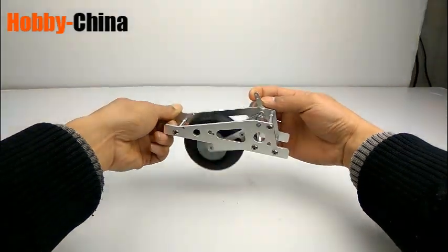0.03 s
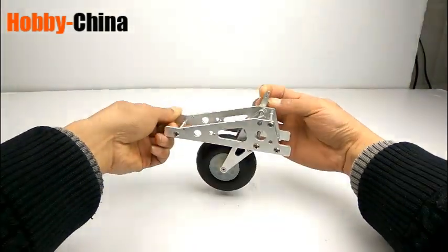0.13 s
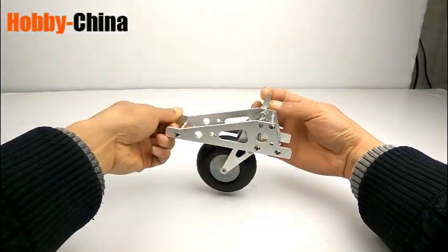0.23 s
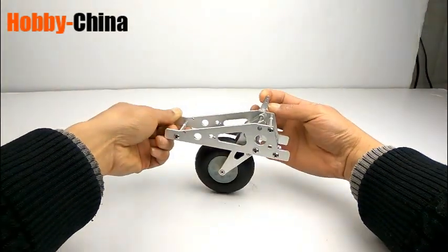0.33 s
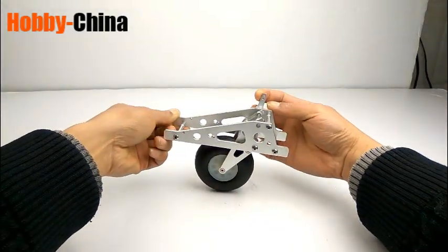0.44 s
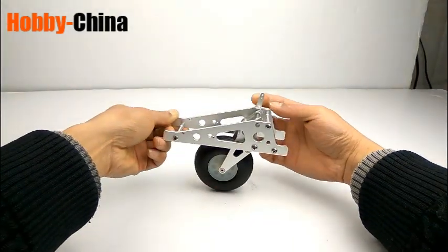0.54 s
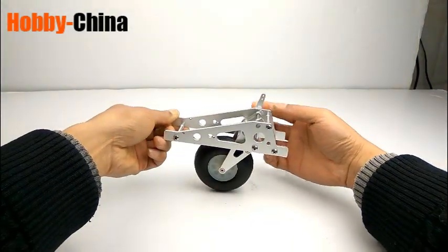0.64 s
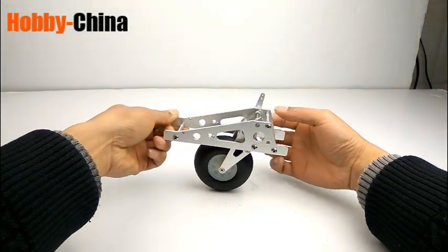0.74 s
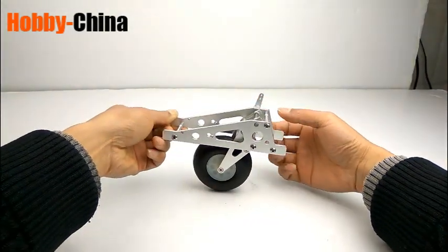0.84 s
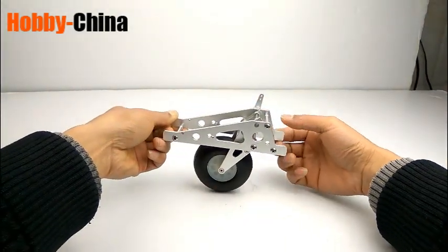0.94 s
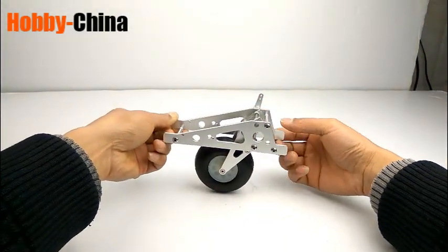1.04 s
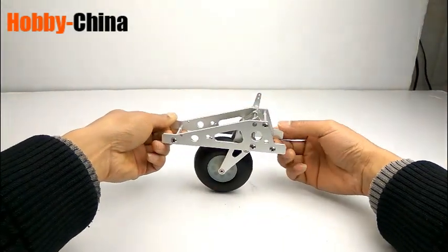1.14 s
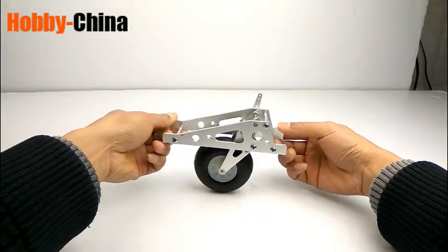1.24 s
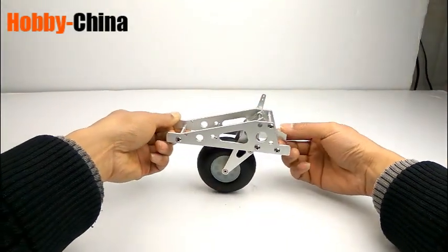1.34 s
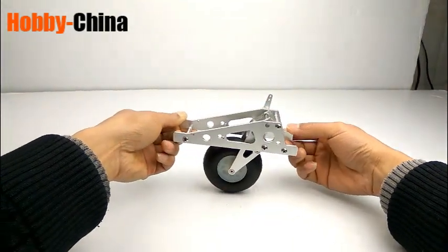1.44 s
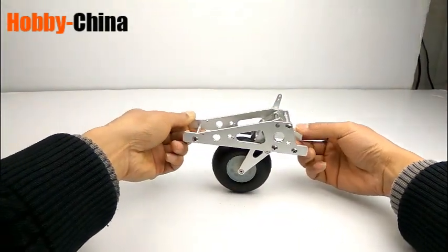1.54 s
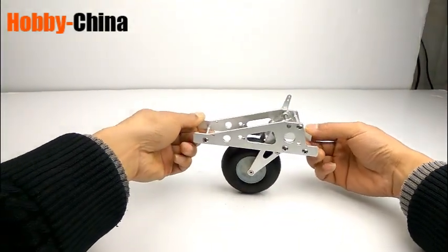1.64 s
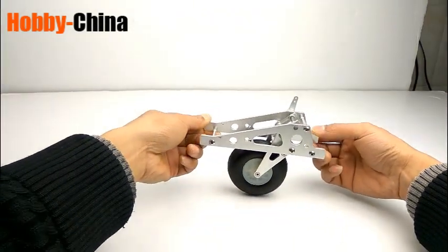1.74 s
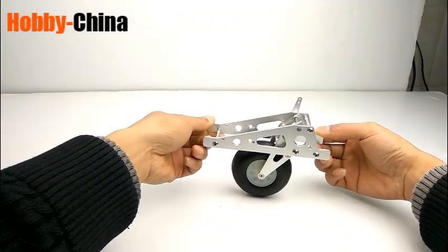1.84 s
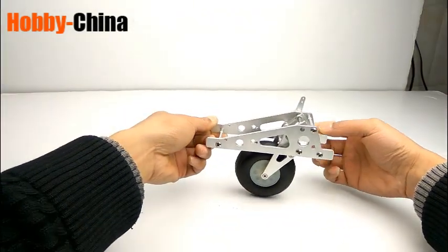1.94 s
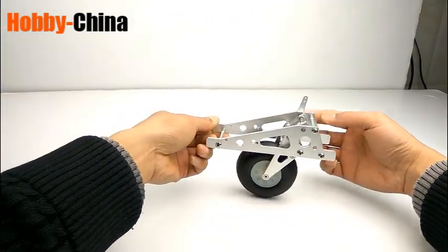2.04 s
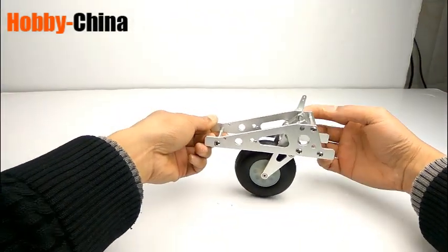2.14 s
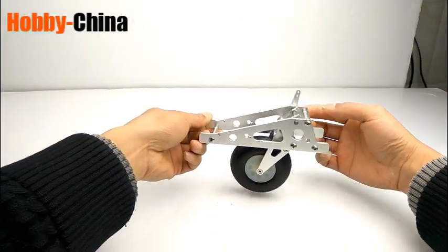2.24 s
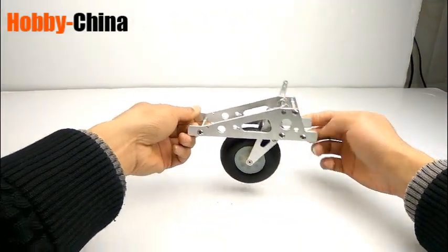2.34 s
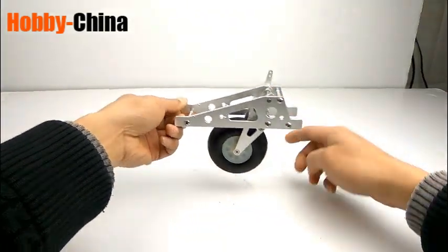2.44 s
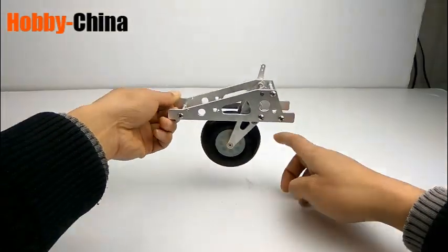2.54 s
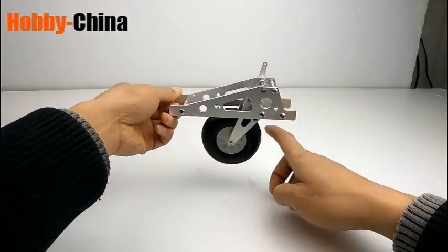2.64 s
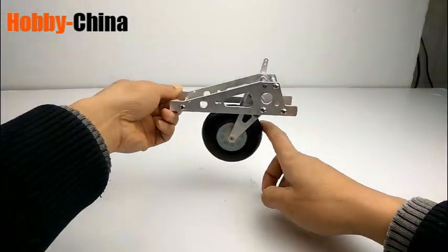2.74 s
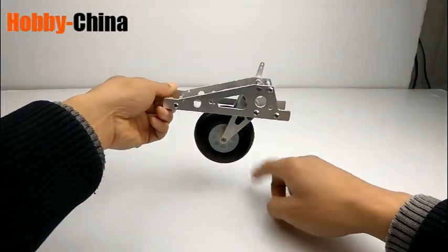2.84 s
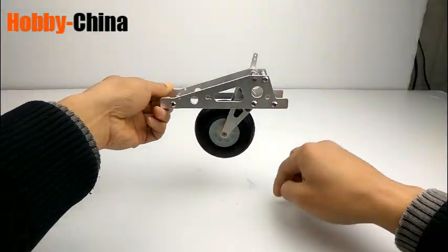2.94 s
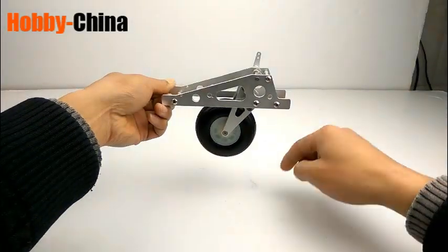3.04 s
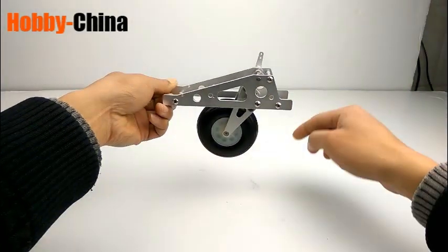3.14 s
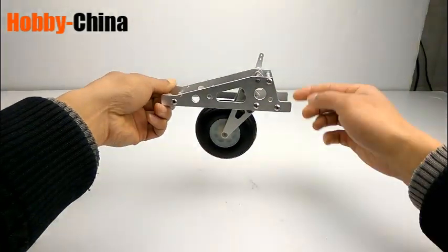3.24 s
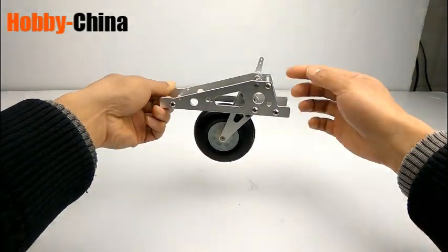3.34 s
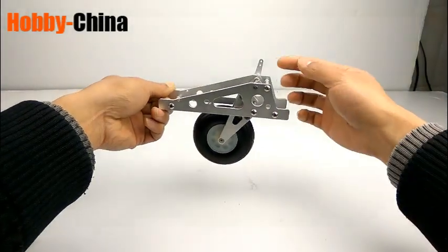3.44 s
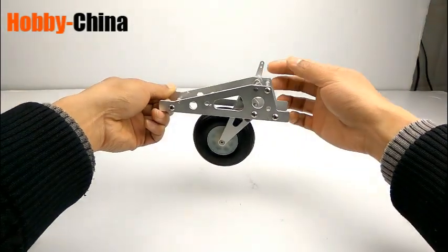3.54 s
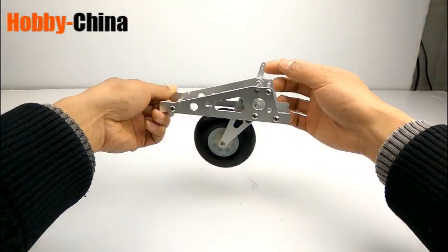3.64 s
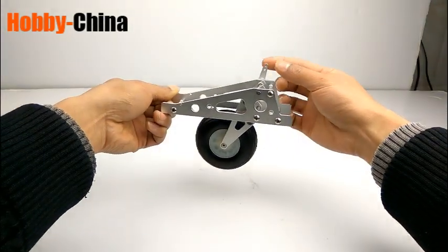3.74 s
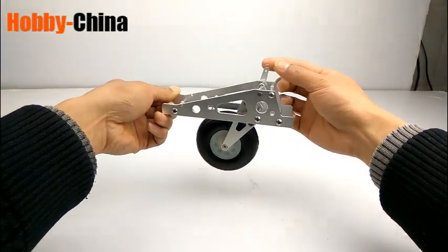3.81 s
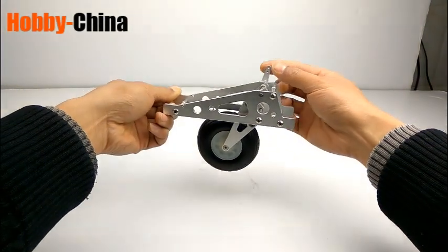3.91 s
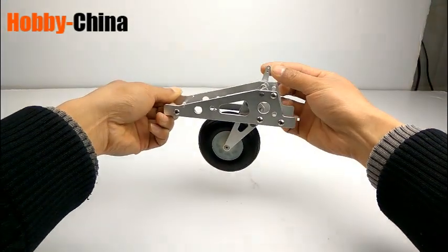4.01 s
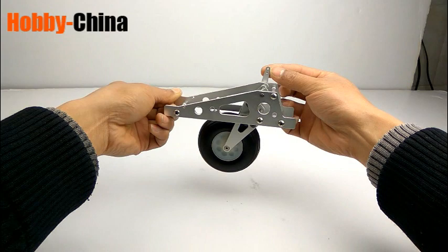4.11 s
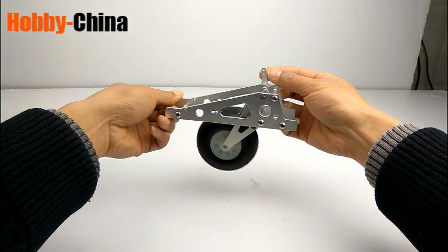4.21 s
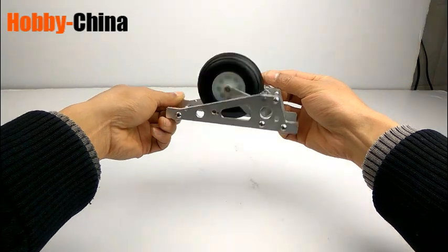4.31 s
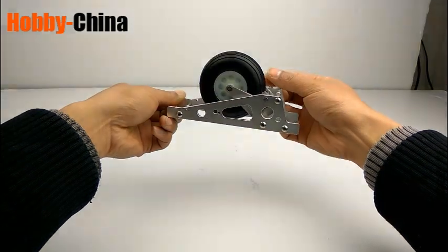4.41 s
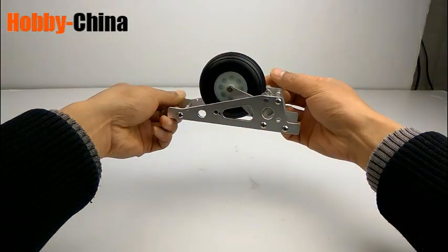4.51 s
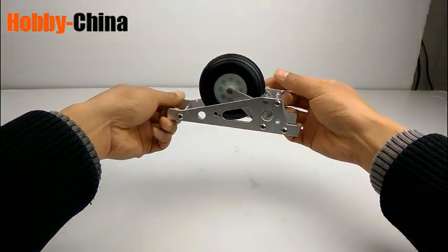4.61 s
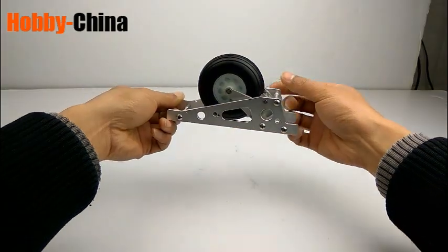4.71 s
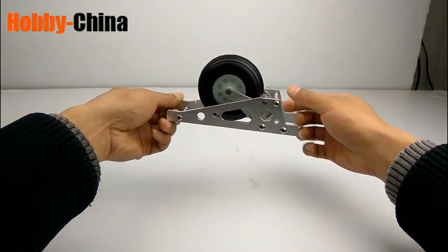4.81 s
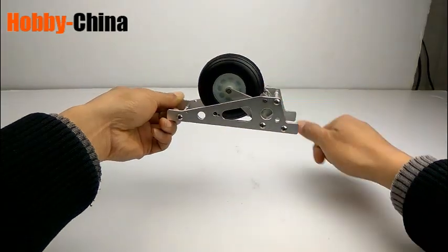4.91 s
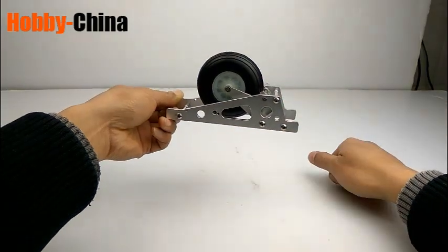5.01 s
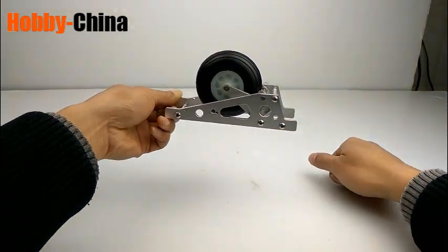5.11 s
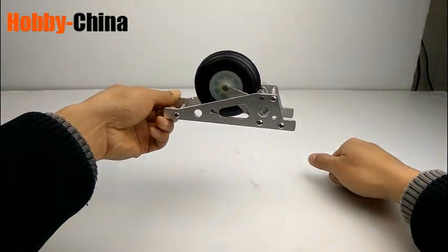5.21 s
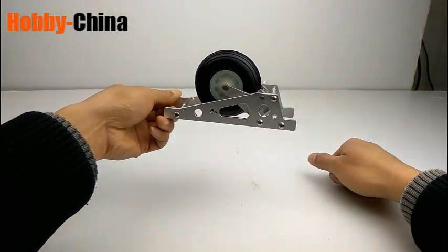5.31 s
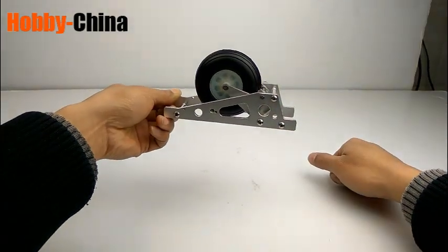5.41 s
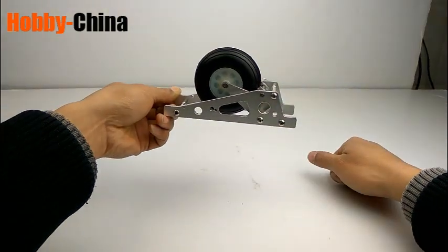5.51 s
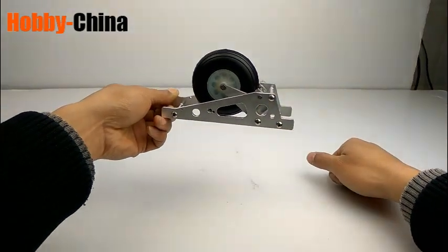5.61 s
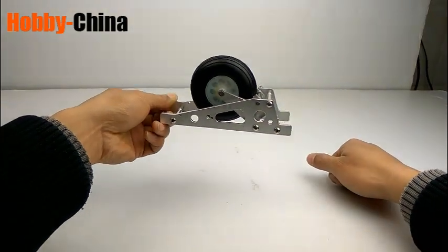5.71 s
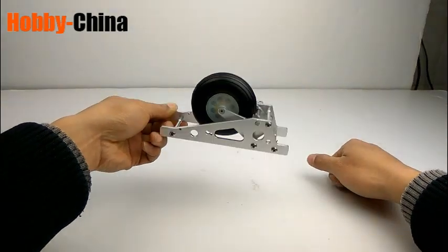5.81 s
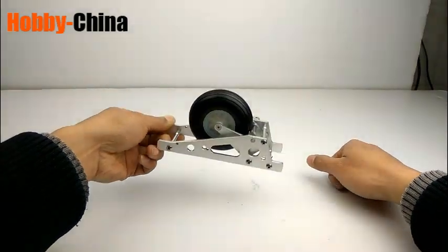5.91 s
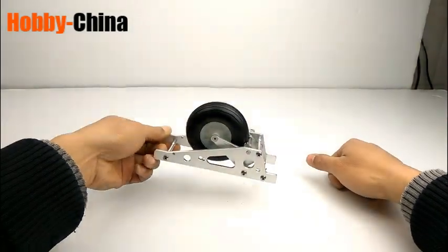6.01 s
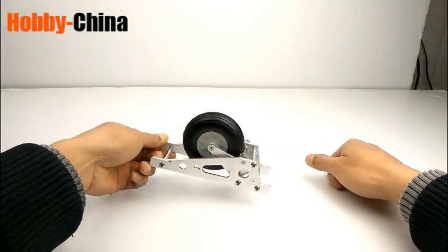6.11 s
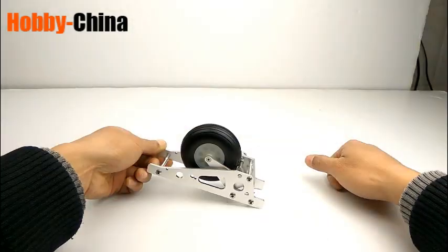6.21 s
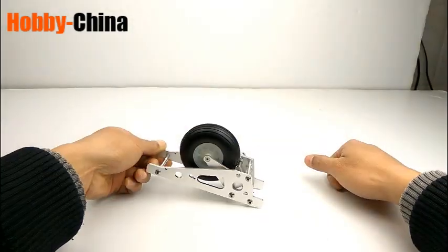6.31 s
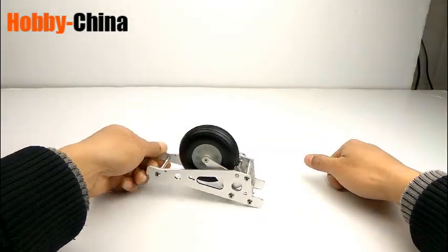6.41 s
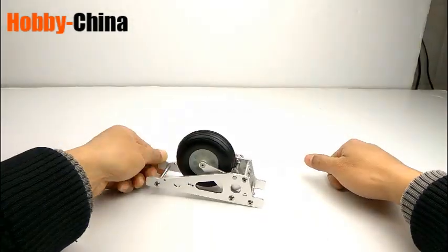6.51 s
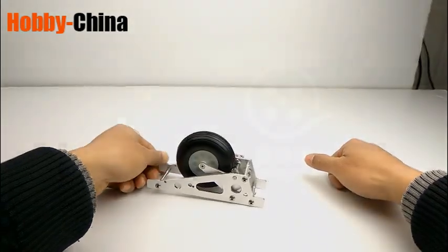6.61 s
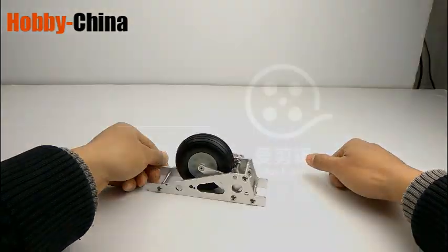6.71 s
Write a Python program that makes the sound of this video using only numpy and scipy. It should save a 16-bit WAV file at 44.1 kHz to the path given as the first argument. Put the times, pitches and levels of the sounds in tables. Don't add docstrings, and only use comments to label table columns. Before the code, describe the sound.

Close to a hollow table top in a small room, a small aluminium wheel retract latches with a bright clack. After near quiet, a sleeve and skin rub the surface, then a finger flicks the wheel and the hand hits the table with a loud boom. The arm chatters and latches again, a finger double-knocks the table, and the frame lands with a clicking thud over faint hiss and rumble.

```python
import sys
import numpy as np
from scipy import signal
from scipy.fft import irfft
from scipy.io import wavfile

SR = 44100
rng = np.random.default_rng(int(sys.argv[2]) if len(sys.argv) > 2 else 0)


def natural_amplitude(level_db):
    exponent = np.asarray(level_db, float) / 20
    return 10 ** exponent


def wrap_up_sound(samples):
    columns = np.atleast_2d(samples).T
    tamed = np.clip(columns, -1, 1)
    steps = np.round(tamed * 32767).astype(np.int16)
    wavfile.write(sys.argv[1], SR, steps)


N = 297675

# pitch_hz, level_db (rms)
CLOCK_LINES = [(7499, -107), (9001, -103), (10497, -108), (11999, -92), (13501, -105)]
# time_s, level_db
RUMBLE_LEVEL = [(0.0, -66), (1.05, -67), (1.3, -71), (1.7, -64), (2.25, -68.5), (3.0, -65.5), (3.6, -70.5),
                (4.8, -69), (5.9, -71.5), (6.75, -60.5)]
# freq_hz, level_db (per Hz)
RUMBLE_COLOUR = [(18, -37), (30, 11), (81, -10), (113, -1.5), (144, -2), (236, -2), (386, -11.5),
                 (418, -12.5), (620, -13), (950, -19), (1400, -31), (1950, -45), (3300, -90)]
# freq_hz, level_db (per Hz)
HISS_COLOUR = [(500, -30), (800, -5), (1300, -10), (2000, -8), (3200, -6.5), (5000, -8.5), (6500, -11.5),
               (8000, -19), (11000, -40)]
# freq_hz, correlation (-1 to 1)
PORT_LIKENESS = [(60, 0.88), (160, 0.91), (440, 0.55), (1200, 0.2), (3250, 0.6), (8820, 0.74)]
# low_hz, high_hz
HOUSING_DIP_HZ = [7500, 8270]
# freq_hz, level_db
PORT_TILT = [(1000, -1), (1670, 6.5), (2910, -5.5), (5070, 0), (8820, -2.5)]
# freq_hz, t60_s
ROOM_T60 = [(250, 0.3), (500, 0.32), (1000, .24), (1500, 0.28), (2100, 0.33), (2800, 0.33), (4000, 0.27),
            (5500, 0.24), (7000, 0.2), (9000, 0.2)]
# freq_hz, level_db
ROOM_COLOUR = [(100, -5), (500, 2), (1300, -0.5), (2000, 3.5), (3500, -2), (5500, -5), (7200, -2.5),
               (9000, -4)]
# fullest_s, swell_s, fade_s, cloth_db (hiss in air), rub_db (through the table)
SLEEVE_DRAGS = [(2.519, 0.12, 0.13, -69, -72.5), (2.65, 0.034, 0.097, -70, -64.5),
                (2.8, 0.15, 0.036, -71, -62.5), (2.939, 0.2, 0.047, -74.5, -63),
                (3.27, 0.21, 0.27, -72.5, -70), (3.5, 0.084, 0.17, -81.5, -91),
                (3.799, 0.29, 0.2, -84, -75), (4.112, 0.097, 0.16, -104, -72),
                (4.6, 0.068, 0.064, -73, -66.5), (4.698, 0.083, 0.14, -79, -65.5),
                (6.2, 0.15, 0.45, -78.5, -75)]
# freq_hz, level_db (per Hz)
CLOTH_COLOUR = [(530, -40.5), (900, -14.5), (1200, -5.5), (2130, -2.5), (2560, -6), (2910, -4.5),
                (3180, -8.5), (5400, -1.5), (7200, -33), (9360, -71), (15800, -120)]
# freq_hz, level_db (per Hz)
RUB_COLOUR = [(71, -44), (120, -9), (217, -3), (345, -1.5), (413, -4), (771, -10.5), (1500, -26.5),
              (1950, -59), (3300, -120)]
# fullest_s, length_s, resonance_hz, width_hz, level_db
SKIN_SLIPS = [(2.63, .04, 287, 59.4, -64), (2.687, 0.049, 317, 80, -65), (2.703, 0.024, 880, 120, -61.5),
              (2.713, 0.036, 277, 70, -58), (2.739, 0.052, 754, 89.5, -59), (2.766, 0.022, 480, 90, -64),
              (2.776, 0.035, 1120, 200, -63.5), (2.802, .06, 333, 80, -61), (2.887, 0.036, 516, 119, -69),
              (4.678, 0.017, 347, 60, -56.5), (4.687, 0.027, 179, 60, -57), (4.71, .025, 320, 50, -52.5),
              (4.713, .03, 660, 90, -71)]
# start_s, peak_db, contact_ms, brightness_hz, spot (0 hand, 1 finger, 2 frame)
KNOCKS = [(0.414, -36, 3.6, 297, 2), (0.447, -48, 1.1, 900, 0), (1.931, -65, 5.5, 200, 2),
          (2.6207, -76, 3.6, 900, 1), (2.949, -46, 3, 900, 0), (2.953, -10.5, 3.34, 1300, 0),
          (5.053, -22.5, 1.95, 920, 1), (5.064, -26, 4.4, 710.6, 1), (4.098, -65, 8.2, 502, 0),
          (4.674, -48.5, 1.86, 800, 0), (6.314, -17, 1.9, 900, 2), (6.641, -59, 19, 400, 2),
          (0.234, -47, 1.5, 400, 0), (4.399, -47.5, 22, 450, 0), (5.108, -33.5, 2.8, 225, 1)]
# pitch_hz, level_db, t60_s
UNDER_HAND = [(83, -8, .6), (120.5, -2, 0.48), (169.4, -8, 0.52), (207, -6, .35), (298, -3, 0.11),
              (417.4, -3.5, .12), (490, -21, .12), (581, -11, 0.073), (668, -22, 0.23), (748, -15.5, 0.14),
              (810, -26.5, .1), (920, -6, .07), (1056, -19, .08), (1277, -12.5, .07), (1480, -13.5, .06)]
# pitch_hz, level_db, t60_s
UNDER_FINGER = [(80, -19, 0.98), (117, -15.5, .45), (164.3, 1, 0.77), (178, -6.5, .4), (200, -9.5, 0.25),
                (261.4, -3, 0.14), (400, -24.5, .08), (494, -21, .15), (632, -20, 0.16), (750, -25.5, 0.2),
                (920, -15, 0.1)]
# pitch_hz, level_db, t60_s
UNDER_FRAME = [(79.55, -10, 1), (125.7, -2, 0.48), (163.1, -4, 0.45), (206.4, -1.5, 0.2), (270.3, -5, 0.18),
               (386.3, -15.5, 0.32), (450, -18, 0.11), (545.3, -23, .12), (617, -25, .15), (880, -44, 0.17)]
# freq_hz, level_db (per Hz)
FRAME_COLOUR = [(760, -35.5), (1300, -11), (1660, -1.5), (1980, 0.5), (2660, -7), (3750, -0.5), (4760, 0),
                (6730, -9), (7600, -12.5), (8200, -20), (9270, -29.5), (12100, -73), (20400, -120)]
# pitch_hz, width_hz, level_db
WHEEL_MODES = [(640, 130, 2), (946.6, 250, -1), (1140, 180, -3)]
# start_s, peak_db, snap_hz, dull_db (below 1.2 kHz)
TICKS = [
    (2.9257, -64, 1100, 12),
    (3.3552, -59.5, 1800, -20),
    (4.0252, -59.5, 1250, -10),
    (4.0774, -69, 2000, 5),
]
# start_s, peak_db, snap_hz, rattle_ms, dull_db
FLICK = [
    (2.9470, -46.5, 1602, 1.7, 0),
    (2.953, -25, 2600, 0.79, -3.5),
    (2.957, -31, 1950, 4.8, 2),
]
# start_s, peak_db, snap_hz, rattle_ms
CHATTER = [
    (4.2634, -51, 3450, 2.9),
    (4.2705, -44, 4800, 4.5),
    (4.28, -39, 4900, 2.2),
    (4.286, -38.5, 4000, 3.1),
    (4.295, -42, 4260, 6.1),
    (4.302, -47.5, 4200, 8),
    (4.326, -45.5, 4700, 2.8),
    (4.3424, -53.5, 5000, 3.7),
    (4.3792, -51, 5640, 5.1),
]
# start_s, peak_db, snap_hz, rattle_ms
LATCH = [(0.2316, -29.5, 5600, 4), (0.236, -46, 2046, 5.5), (0.2394, -20.5, 4650, 0.61),
         (0.2450, -30, 3894, 2.1), (0.2501, -34.5, 3812, 4.1), (4.394, -36.5, 5000, 1.24),
         (4.3950, -29, 5240, 1.5), (4.3983, -30, 3670, 2.2), (4.4014, -26.5, 4260, 4.9),
         (4.4091, -35, 3890, 9.7), (4.429, -41, 3900, 4.2)]
# start_s, peak_db, snap_hz,
# rattle_ms, dull_db
SHAKES_AND_TAPS = [
    (0.215, -49, 4530, 14.4, -9),
    (0.45, -72, 1190, 2, 14),
    (2.0664, -72, 2000, 22, -1),
    (5.0525, -54, 5400, 40, -11),
    (5.054, -58.5, 2400, 31, -6),
    (6.3137, -30, 4000, 0.39, -12),
    (6.318, -42, 2360, 6.4, -17),
    (6.327, -53.5, 2740, 31, 1),
                   (6.637, -67.5, 3500, 8, 4),
    (2.6225, -68, 1500, 2, 12),
    (4.6735, -72, 1500, 2, 11),
]
EDGES = 35 * 2 ** np.arange(0, 8.8, .4)


def rms_one(x):
    return x / np.sqrt(np.mean(x ** 2) + 1e-20)


def at_hz(points, hz):
    table = np.array(points)
    return np.interp(np.log(hz), np.log(table[:, 0]), table[:, 1])


def butter(x, order, hz, kind="low"):
    return signal.sosfilt(signal.butter(order, hz, kind, fs=SR, output="sos"), x)


def drift(rate):
    knots = rng.standard_normal(3000)
    return np.interp(np.arange(N) / SR * rate, np.arange(len(knots)), knots)


def stretch(start_s, size):
    start = round(start_s * SR)
    return slice(start, min(start + size, N))


def ring(force, hz, t60):
    radius = natural_amplitude(-60 / (t60 * SR))
    turn = 2 * np.pi * hz / SR
    return signal.lfilter([0, np.sin(turn)], [1, -2 * radius * np.cos(turn), radius * radius], force)


def stroke(t, fullest, swell, fade):
    share = np.clip(np.minimum(1 + (t - fullest) / swell, 1 - (t - fullest) / fade), 0, 1)
    return np.sin(np.pi / 2 * share)


def bands(size):
    white = rng.standard_normal((2, 2, size))
    for k, (low, high) in enumerate(zip(EDGES, EDGES[1:])):
        mid, side = butter(white[k % 2], 2, [low, high], "band")
        hz = np.sqrt(low * high)
        alike = at_hz(PORT_LIKENESS, hz)
        yield hz, np.sqrt(1 + alike) * mid + np.sqrt(1 - alike) * side * [[1], [-1]]


def electronics():
    t = np.arange(N) / SR
    flicker_rate = 430
    lines = np.zeros((2, N))
    for hz, db in CLOCK_LINES:
        level_db = db + 3.8 * drift(flicker_rate) + 1.9 * drift(flicker_rate) * [[1], [-1]]
        lines += np.sqrt(2) * natural_amplitude(level_db) * np.sin(2 * np.pi * (hz * t + rng.random()))
    return lines + natural_amplitude(-99) * rng.standard_normal((2, N))


def hang(t):
    hang_db, rise_s, t60_s = -35, 0.065, 0.53
    level = np.zeros(len(t))
    for start_s, peak_db, *rest in KNOCKS:
        since = np.maximum(t - start_s, 0)
        level += natural_amplitude(peak_db + hang_db - 60 * since / t60_s) * (1 - np.exp(-since / rise_s))
    return level


def backgrounds():
    t = np.arange(N) / SR
    cloth, rub = np.zeros(N), np.zeros(N)
    for fullest, swell, fade, cloth_db, rub_db in SLEEVE_DRAGS:
        movement = stroke(t, fullest, swell, fade)
        cloth += natural_amplitude(cloth_db) * movement
        rub += natural_amplitude(rub_db) * movement
    rumble = natural_amplitude(np.interp(t, *np.transpose(RUMBLE_LEVEL)) + 1.2 * drift(rate=1.4)) + hang(t)
    layers = [(RUMBLE_COLOUR, rumble), (HISS_COLOUR, natural_amplitude(-85)), (CLOTH_COLOUR, cloth),
              (RUB_COLOUR, rub * natural_amplitude(1.3 * drift(rate=59)))]
    centres = np.sqrt(EDGES[1:] * EDGES[:-1])
    norms = []
    for colour, level in layers:
        norms.append(np.sqrt(np.sum(natural_amplitude(at_hz(colour, centres)) ** 2 * np.diff(EDGES)) * 2 / SR))
    out = np.zeros((2, N))
    for hz, noise in bands(size=N):
        power = sum((natural_amplitude(at_hz(colour, hz)) * level / norm) ** 2 for (colour, level), norm in zip(layers, norms))
        out += np.sqrt(power) * natural_amplitude(1.6 * drift(rate=9)) * noise
    return out


def room(source, wet_db):
    t = np.arange(30000) / SR
    tail = np.zeros((2, len(t)))
    for hz, noise in bands(size=len(t)):
        tail += natural_amplitude(at_hz(ROOM_COLOUR, hz) - 60 * t / at_hz(ROOM_T60, hz)) * noise
    tail = tail * (1 - np.exp(-(t / 0.035) ** 2))
    tail = tail / np.sqrt(np.sum(tail ** 2, axis=1, keepdims=True))
    return natural_amplitude(wet_db) * signal.fftconvolve(source, tail, axes=1)[:, :N]


def skin_slips():
    slip_rate_hz = 580
    out, t = np.zeros(N), np.arange(5000) / SR
    for fullest_s, length, hz, width, db in SKIN_SLIPS:
        grains = (rng.random(len(t)) < slip_rate_hz / SR) * rng.laplace(size=len(t))
        grains = grains + 0.042 * rng.standard_normal(len(t))
        rasp = rms_one(ring(grains, hz, 3.0 / width)) * stroke(t, length, length, length)
        out[stretch(fullest_s - length, size=len(t))] += natural_amplitude(db) * rasp
    return out


def table_thuds():
    spot_db = (-12, -13.5, -18)
    out, t = np.zeros((2, N)), np.arange(22000) / SR
    for hz, noise in bands(size=N):
        if hz > 2600:
            break
        t60 = 0.18 * (hz / 500) ** -1.1
        level = np.zeros(N)
        for start_s, peak_db, contact_ms, bright_hz, spot in KNOCKS:
            reach = 1 / np.sqrt((1 + (hz / bright_hz) ** 8) * (1 + (190 / hz) ** 6))
            dying = natural_amplitude(-60 * t / t60) * (1 - np.exp(-t * 1000 / contact_ms))
            at = stretch(start_s, size=len(t))
            level[at] += (natural_amplitude(peak_db + spot_db[round(spot)] - 9.0) * reach * dying)[:at.stop - at.start]
        out += level * rms_one(noise)
    return out


def table_knocks():
    roughness = 1.6
    out, t = np.zeros(N), np.arange(36000) / SR
    for start_s, peak_db, contact_ms, bright_hz, spot in KNOCKS:
        push = t / (contact_ms / 1000)
        force = push * np.exp(-push) * (1 + roughness * rng.standard_normal(len(t)))
        force = butter(force, 4, bright_hz) + 1e-18
        modes = (UNDER_HAND, UNDER_FINGER, UNDER_FRAME)[round(spot)]
        boom = sum(natural_amplitude(db) * rms_one(ring(force, hz, t60)) * np.sqrt(t60) for hz, db, t60 in modes)
        boom = boom / sum(natural_amplitude(db) for hz, db, t60 in modes) / 4.92
        slap = butter(force, 2, 250, "high")
        sound = boom + natural_amplitude(-14.5) * slap / np.abs(slap).max()
        at = stretch(start_s, size=len(t))
        out[at] += natural_amplitude(peak_db) * sound[:at.stop - at.start]
    return out


def metal_contacts():
    touches = [(s, db, dull_db, -1.5, 1.8, hz, 0, 27.5) for s, db, hz, dull_db in TICKS]
    touches += [(s, db, dull_db, -0.3, ms, hz, 0, 6) for s, db, hz, ms, dull_db in FLICK]
    touches += [(s, db, -12.5, 2, ms, hz, 0, 9.5) for s, db, hz, ms in CHATTER]
    touches += [(s, db, -17, 0, ms, hz, 0, 9.5) for s, db, hz, ms in LATCH]
    touches += [(s, db, dull_db, 0.97, ms, hz, -5, 7.5) for s, db, hz, ms, dull_db in SHAKES_AND_TAPS]
    return touches


def later(x, lag_ms):
    fine = signal.resample(x, 8 * len(x))
    return signal.resample(np.roll(fine, round(lag_ms * SR * 8 / 1000)), len(x))


def metal_clicks():
    direct, to_walls, t = np.zeros((2, N)), np.zeros(N), np.arange(4800) / SR
    plates = np.r_[np.arange(1100, 4000, 270), np.geomspace(4070, 9500, 14)] * natural_amplitude(rng.normal(0, .1, 25))
    damping = np.maximum(plates, 3000)
    touch = (t == 0) + 1e-18
    modes = np.array([(-1) ** k * ring(touch, hz, 25.4 / damping[k]) for k, hz in enumerate(plates)])
    wheel = sum(natural_amplitude(db) * ring(touch, hz, 2.0 / width) for hz, width, db in WHEEL_MODES)
    grid, ends = np.fft.rfftfreq(len(t), 1 / SR), np.r_[700, plates, 10500]
    tilt_db = at_hz(PORT_TILT, plates) * [[.35], [-.35]]
    for start_s, peak_db, dull_db, pan_db, rattle_ms, snap_hz, shade_db, focus_db in metal_contacts():
        dying = np.exp(-t / (np.clip(rattle_ms, .3, 32) / 1000))
        force = np.clip(rng.laplace(size=len(t)), -3, 3) * dying / 3
        force += 1.3 * touch
        off_snap_db = np.minimum(focus_db * np.log2(plates / snap_hz) ** 2, focus_db)
        gains = natural_amplitude(at_hz(FRAME_COLOUR, plates) - off_snap_db) * damping
        if shade_db:
            gains = gains / (1 + (plates / 7100) ** 16)
        port_gains = gains * natural_amplitude(2.5 * rng.standard_normal((2, len(plates))) + tilt_db)
        bright = signal.fftconvolve(force[None], port_gains @ modes)[:, :len(t)]
        bright = bright / np.abs(bright).max()
        dull = signal.fftconvolve(force, wheel)[:len(t)]
        dull = natural_amplitude(dull_db - 2) * dull / np.abs(dull).max()
        sound = natural_amplitude(peak_db + 10.5) * butter(bright + dull, 2, 350, "high")
        ports = np.array([later(sound[0], lag_ms=.045), sound[1]])
        at = stretch(start_s, size=len(t))
        direct[:, at] += ports * natural_amplitude(pan_db * np.array([[.5], [-.5]]))
        blurred = np.roll(irfft(np.interp(grid, ends, np.r_[0, gains / damping, 0])), 100)
        wall_sound = rms_one(blurred) * bright.std() + rms_one(wheel) * dull.std()
        to_walls[at] += natural_amplitude(peak_db - 5.0 + shade_db) * wall_sound
    return direct, butter(to_walls, 2, 350, "high")


def scene():
    knocks = butter(table_knocks(), 4, 71, "high")
    clicks, to_walls = metal_clicks()
    upper = butter(knocks, 2, 260, "high")
    echoes = room((to_walls + natural_amplitude(-7.5) * upper)[None], wet_db=-0.5)
    table = knocks * natural_amplitude([[.2], [-.2]]) + table_thuds() + skin_slips()
    return backgrounds() + echoes + table + clicks


def roll_off(x):
    return signal.sosfilt(signal.butter(12, 14100, fs=SR, output="sos"), x)


def record(dry):
    shaped = butter(dry, 3, 65, "high")
    shaped = butter(shaped, 12, 9250)
    shaped = shaped - .85 * butter(shaped, 1, HOUSING_DIP_HZ, "band")
    return roll_off(shaped + electronics())


dry = scene()
out = record(dry)
wrap_up_sound(out)
```